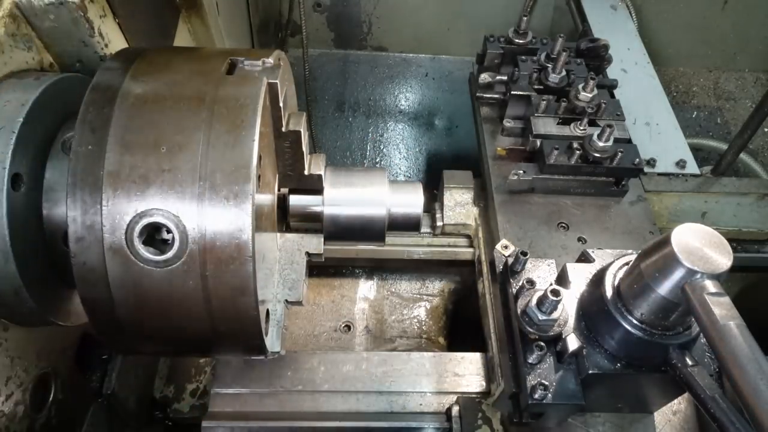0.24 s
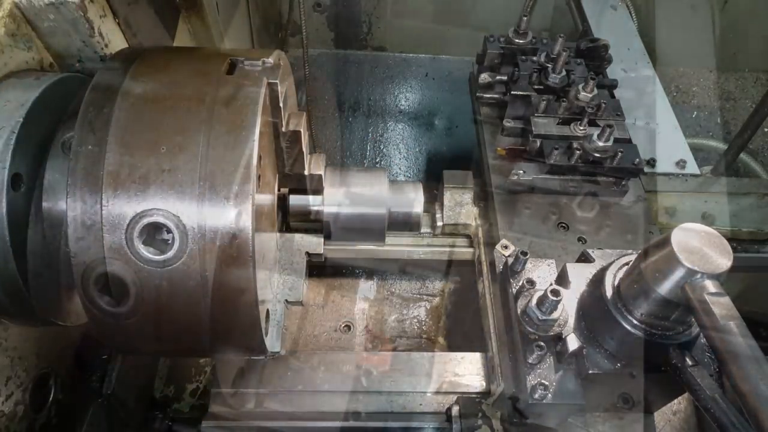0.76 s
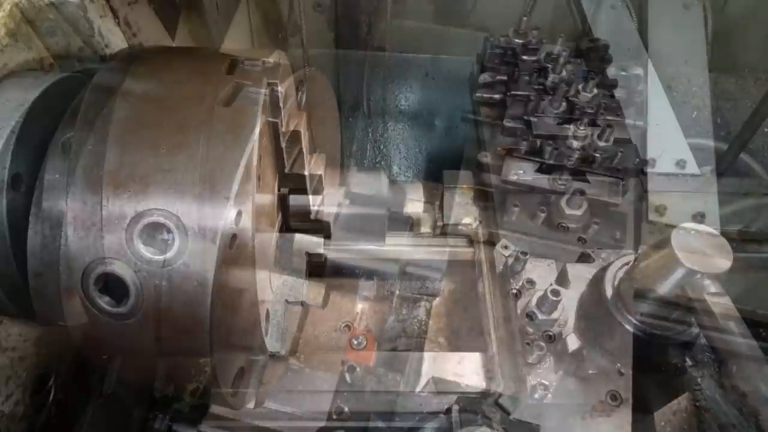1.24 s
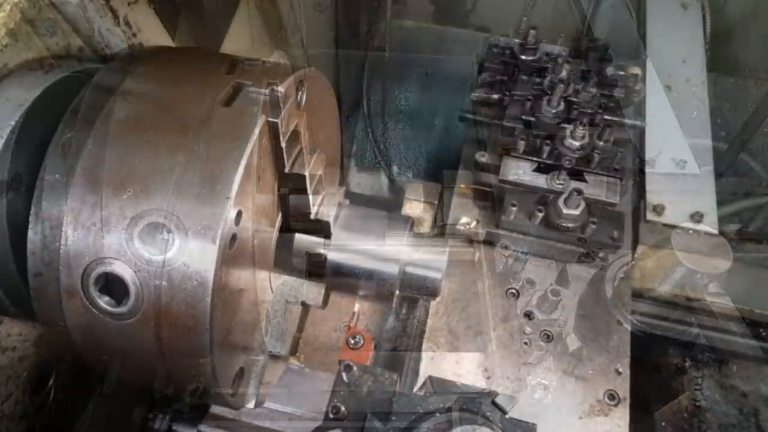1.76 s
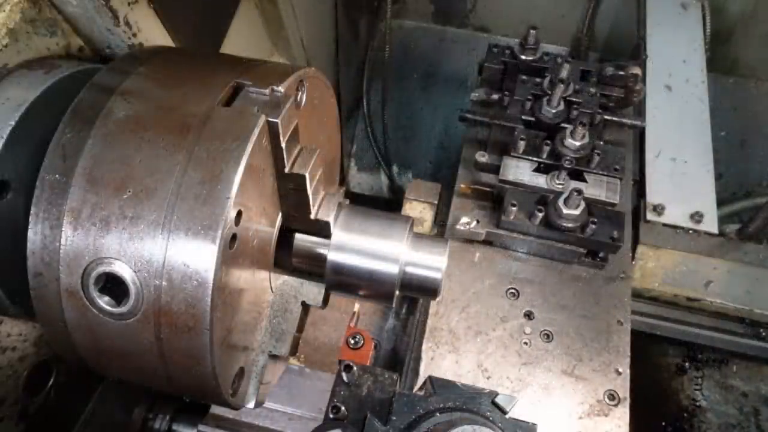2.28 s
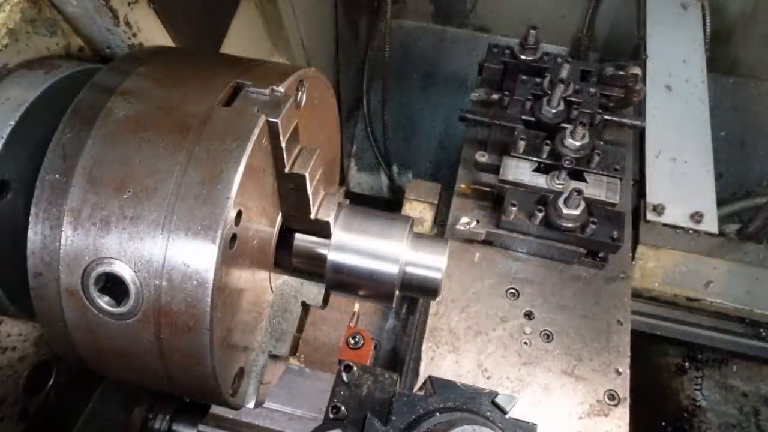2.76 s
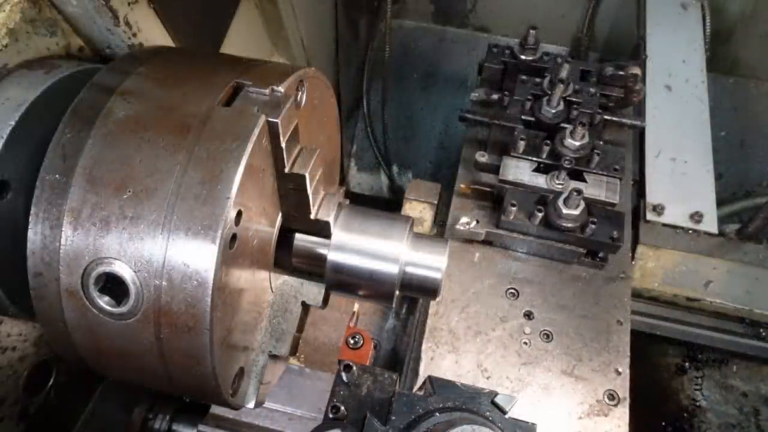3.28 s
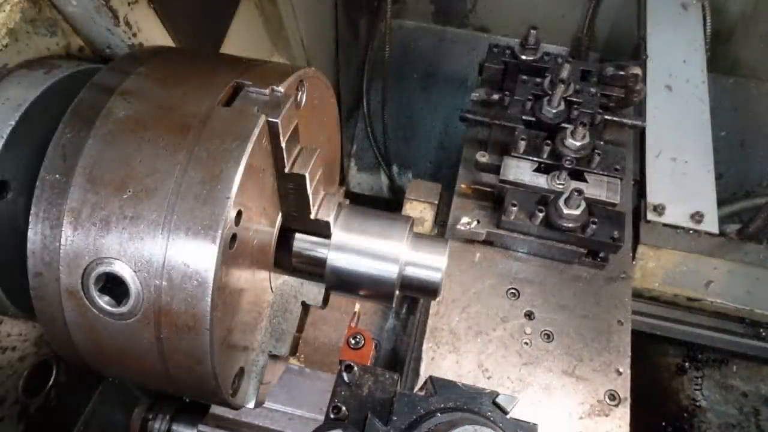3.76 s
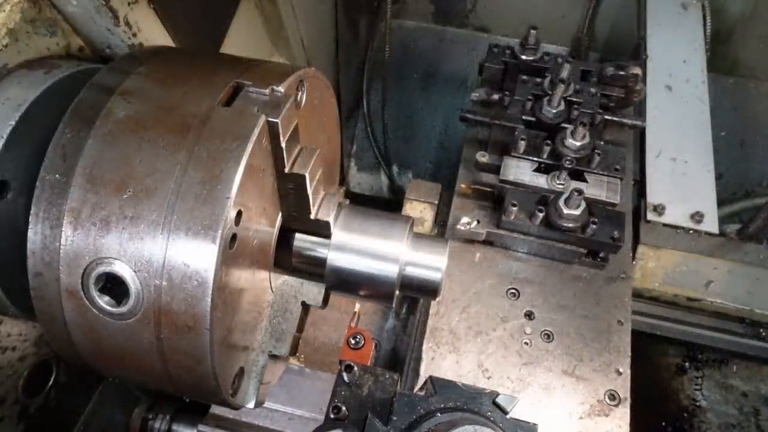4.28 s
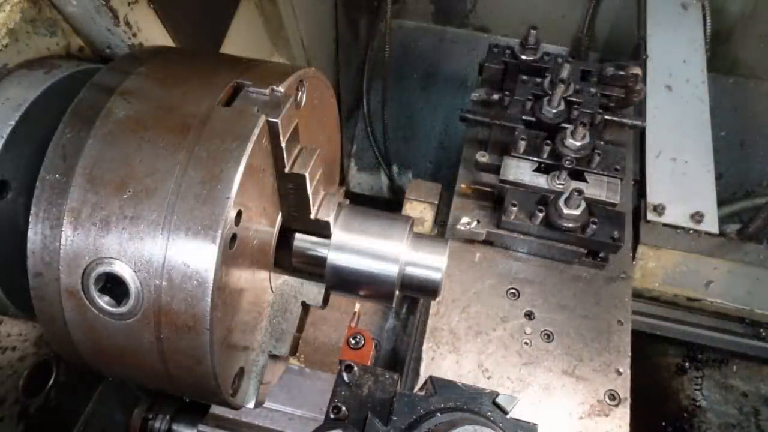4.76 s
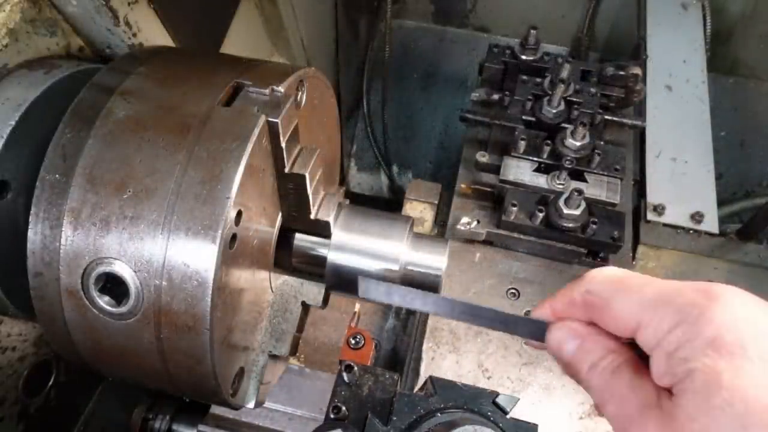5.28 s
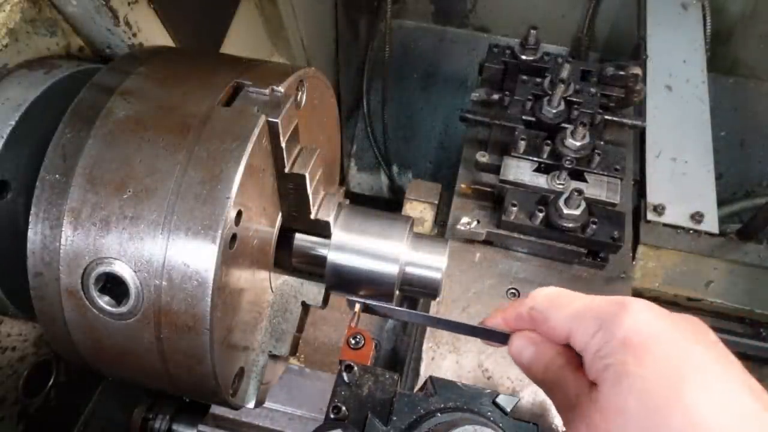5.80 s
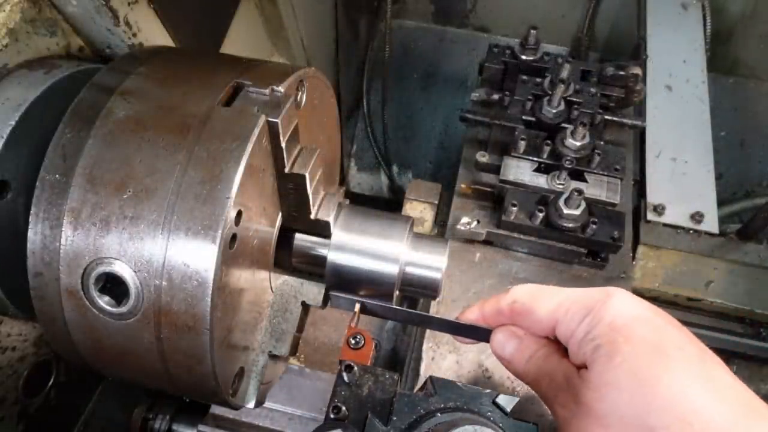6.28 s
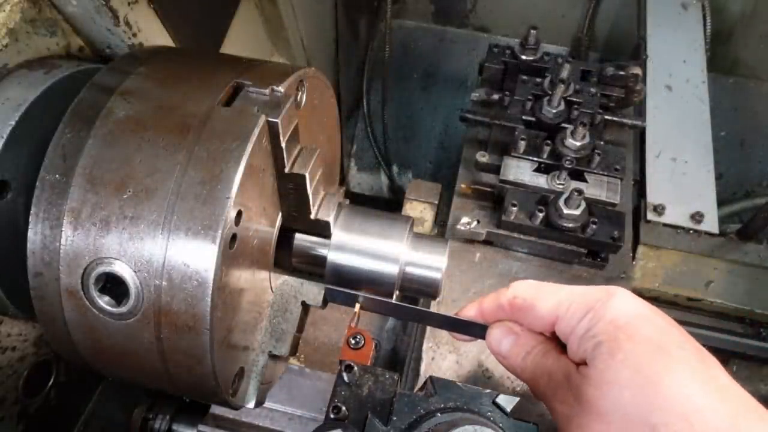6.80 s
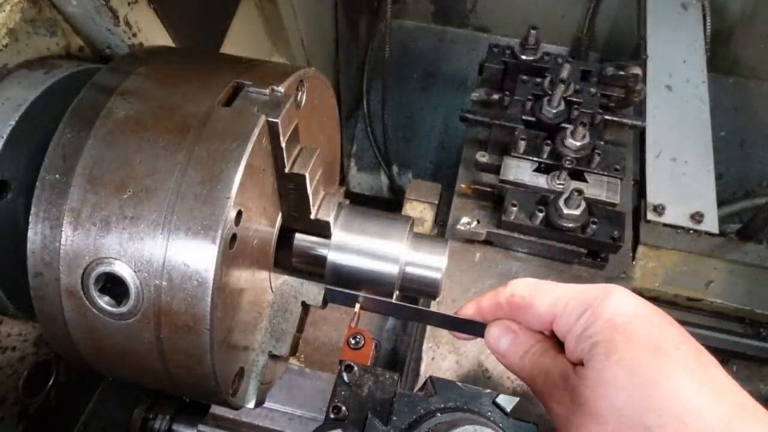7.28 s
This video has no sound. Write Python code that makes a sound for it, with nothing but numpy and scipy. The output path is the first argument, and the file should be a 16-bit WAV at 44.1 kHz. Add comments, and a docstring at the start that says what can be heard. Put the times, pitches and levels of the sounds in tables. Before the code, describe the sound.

In a small workshop with a faint hum, metal parts are handled on a lathe near the microphone. A chuck key rings brightly and rattles until it seats with a clunk. Lighter parts knock here and there, heavy ones clunk about halfway through and again a little later, and a file finishes with a few thin ticks. Quiet rustling fills some of the gaps, and each impact has a short echo.

```python
"""A brisk brush of hiss and a soft clunk come first, then the bright clang of a steel chuck key: a workpiece is
being clamped in a lathe in a small, hard-walled workshop. Impacts excite the key's natural modes, and it
rattles until it seats. The seating key and heavy parts clunk, lighter ones knock and a file ticks against the
work, each a burst of contact noise shaped by resonances and prolonged by reflections. Under it lie the rustle
of handling, dull bumps, a faint rasp, thin squeals, motor hum and shop air."""
import sys
import numpy as np
from scipy import signal
from scipy.fft import rfft, irfft, next_fast_len
from scipy.io import wavfile
from scipy.ndimage import uniform_filter1d, minimum_filter1d

SR = 44100
rng = np.random.default_rng(int(sys.argv[2]) if len(sys.argv) > 2 else 0)


def persist_wave(psi):
    """Save psi, clipped to +-1, as 16-bit WAV."""
    counts = np.round(np.clip(psi, -1, 1) * 32767).astype(np.int16)
    wavfile.write(sys.argv[1], SR, np.atleast_2d(counts).T)


N = 332514
TIME = np.arange(N) / SR
KEY_STRIKE_S, KEY_SEATED_S, KEY_PIVOT_HZ = .7578, .94, 5000

# modes of the free key, and of key and chuck ringing as one: pitch_hz, level_db
FREE_KEY_MODES = [(3617, -28), (3683, -39), (3748, -40), (3812, -40), (4466, -41), (5299, -42), (5420, -44),
                  (5588, -36), (5637, -31.5), (6438, -39), (6619, -35), (7710, -36.5), (8367, -38),
                  (9223, -38), (10310, -41), (14003, -43), (14205, -39)]
SEATED_KEY_MODES = [(565, -44), (603, -41), (655, -44), (721, -44), (3770, -38.5), (4528, -43), (5400, -43),
                    (6550, -46)]
# blows that excite them: start_s, strength_db, tilt_db_per_octave (about the pivot), hold_s
FREE_KEY_STRIKES = [(0.758, -2, -2, 0.02), (.802, -2, 1, 0.036), (0.866, -11, -3, 0.02)]
SEATING_STRIKES = [(0.948, 2.5, -0.5, 0.0074), (.987, -11, -4, 0.0035)]
# clunks: the key seating in the chuck (0.87-0.99 s), then heavy parts: start_s, level_db, boom_db, body_db,
# bright_db, scrape_s, chatter_s, pan_db
CLUNK_BLOWS = [ (.172, -48, 9, -4, 13, 0.0037, 0.033, 1.5), (.866, -31, -10, -8, -1, 0.014, 0.018, 1.5),
               (.959, -28.5, -9, 1, 14, 0.026, 0.025, 3), (.988, -26.5, -6, 3, 8, 0.022, 0.03, 0.5),
               (3.555, -33.5, 15, 3, 19, 0.0042, 0.26, -1.5), (3.591, -27, 8, -4, 26, 0.0041, 0.036, -3.5),
               (3.598, -22.5, 13.5, -3, 22.5, 0.0026, 0.11, -1.5),
               (3.620, -34, 11, 2, -6, 0.0029, 0.098, 2), (3.671, -42, 24, 9, -10, 0.037, 0.14, 5),
               (3.988, -38.5, -3, -6, 14, 0.0005, 0.08, -1), (5.043, -37, -8, -3, 2, 0.012, 0.044, 1),
               (5.056, -26.5, -9, 5.5, 3.5, 0.0065, 0.13, -1.5),
               (5.080, -34.5, 8.5, 0, 6.5, 0.026, 0.14, 0)]
# light blows: start_s, level_db, body_db, bright_db, scrape_s, chatter_s
LIGHT_BLOWS = [ (1.189, -48, 3, -26, .006, .015), (1.224, -50, 4.5, 0, 0.0011, 0.32),
               (1.861, -45.5, 6.5, -8, 0.0026, 0.12), (2.070, -50, -2, -15, 0.011, 0.026),
               (2.085, -36.5, -1.5, -12.5, 0.0014, 0.075), (2.705, -41, -5.5, 3, .002, 0.098),
               (2.844, -25, -4, -2, 0.0057, 0.011), (2.870, -39, 8.5, 10, 0.024, 0.06),
               (3.161, -54, -8, -12, 0.0018, 0.069), (3.5205, -37.5, -1.5, -19, 0.0076, 0.059),
               (4.165, -49, -3, 20, 0.0009, .012), (5.420, -51, -5, -19, 0.017, 0.21),
               (6.799, -56.5, 24, -16, .007, 0.034)]
# file contacts: start_s, level_db, bright_db, scrape_s, chatter_s
FILE_TICKS = [ (0.7359, -47.5, 1, .001, 0.007), (5.516, -46, 3, 0.0024, 0.0083),
              (5.948, -47.5, -7, 0.0019, 0.021), (6.468, -51.5, -10, 0.025, 0.018),
              (6.545, -44, -11.5, 0.016, 0.023), (6.552, -50, 9, 0.0024, 0.012)]
# resonances of the machine casing, light parts and file: pitch_hz, width_hz, lift_db
CASING_RESONANCES = [(240, 20, 0), (288, 22, 3), (410, 45, -2), (552, 30, 0), (660, 30, 1), (920, 60, -3),
                     (2350, 160, -1), (4950, 240, 4), (5830, 40, 2)]
LIGHT_PART_RESONANCES = [(985, 90, -7), (1830, 240, -5), (2710, 130, 1), (2960, 90, -6)]
FILE_RESONANCES = [(1870, 260, -0.5), (5020, 250, -9)]
# contact spectra of the key, heavy parts, light parts and file: frequency_hz, gain_db
RATTLE_SPECTRUM = [(40, -52), (130, -17.5), (300, -13.5), (600, -2.5), (1200, -9.5), (2300, -0.5),
                   (3300, -4), (4900, 0.5), (7000, -6), (9500, -6), (12000, -11), (15500, -26)]
CLUNK_SPECTRUM = [(40, -39.5), (110, -16.5), (220, -2.5), (350, -6), (560, -0.5), (900, 0), (1300, -1.5),
                  (1700, -1.5), (2600, -4.5), (3400, -10.5), (5000, -19.5), (7000, -24), (10000, -27.5),
                  (15500, -36)]
KNOCK_SPECTRUM = [(60, -23), (170, -6), (400, -14), (800, -9.5), (1300, 2), (1800, 1), (2800, -7),
                  (4000, -10), (6000, -22.5), (8000, -39), (15000, -58)]
TICK_SPECTRUM = [(300, -31), (1400, -13), (2000, -2.5), (3200, -12), (4200, -7.5), (6500, -5.5),
                 (9000, -9.5), (12500, -15.5), (15500, -24.5)]
# light steel-on-steel touches: peak_s, pitch_hz, level_db, half_length_s, width_hz
STEEL_TOUCHES = [(0.929, 3785, -38, .018, 110), (1.145, 5330, -65, .03, 90), (1.279, 5300, -57, 0.011, 90),
                 (1.501, 5220, -61, 0.006, 700), (2.884, 10850, -71, .026, 70),
                 (4.169, 3146, -48, 0.007, 450), (4.274, 3350, -53, 0.007, 900),
                 (4.575, 3800, -56, .003, 1100), (5.651, 2746, -55, 0.0052, 400),
                 (5.948, 3050, -48.5, 0.004, 450)]
# rustling movements: start_s, hold_s, level_db, treble_db
RUSTLE_MOVES = [(0, 0.47, -57, 3.5), (2.21, 0.28, -57.5, -10), (3.834, 0.58, -54.5, -6.5),
                (4.774, 0.53, -53, -16)]
# shifts of weight on the machine: start_s, hold_s, level_db
WEIGHT_SHIFTS = [(0, 0.28, -59), (0.912, 0.089, -55), (1.348, 0.24, -62.5), (2.731, 0.16, -51.5),
                 (5.083, 0.019, -59)]
# course of the rasp: time_s, pitch_hz, level_db
RASP_GLIDE = [(4.6, 2530, -81), (4.78, 2510, -62.5), (5.0, 2560, -56.5), (5.258, 2680, -54),
              (5.38, 2730, -59), (5.55, 2630, -59.5), (5.62, 2640, -87)]
# high squeals: peak_s, top_hz, level_db, half_length_s, sag_hz
SQUEAL_ARCHES = [(1.11, 13700, -74, .09, 1500), (6.27, 9400, -75, .14, 250), (6.33, 13650, -76, .16, 550)]
# partials of the motor: pitch_hz, level_db
HUM_PARTIALS = [(199.5, -70.5), (500.5, -77.5), (899, -75.5)]
# noise spectra of the rustle, bumps and shop air: frequency_hz, gain_db
RUSTLE_SPECTRUM = [(200, -7), (500, 3), (1400, 5.5), (3000, 2), (6000, 1), (9000, -1), (15000, -7.5)]
BUMP_SPECTRUM = [(25, -22.5), (50, -20), (70, -8.5), (130, 2), (200, 4.5), (320, -3), (600, -9),
                 (2000, -55)]
AIR_SPECTRUM = [(30, -40.5), (168, -10.5), (192, -6.5), (307, -9.5), (432, -12), (492, -12), (747, -12),
                (897, -6), (1330, -13.5), (1820, -12), (2020, -17), (3780, -23), (6370, -25.5),
                (15500, -28)]
# reverberation time of the workshop: frequency_hz, t60_s
REVERB_TIMES = [(100, 0.5), (300, 0.6), (1000, 0.42), (3000, 0.38), (7000, 0.36), (15000, 0.31)]
# left-right difference picked up by closely spaced microphones: frequency_hz, gain_db
STEREO_WIDTH = [(250, -12), (700, -5), (2000, -2), (12000, 0.5)]


def key_ring(seated_t60_s=.25):
    """Contact damping: seating stills the key's bright ring, shifts its modes and rings the chuck."""
    free = steel_ring(FREE_KEY_MODES, FREE_KEY_STRIKES, t60_s=.28)
    seated = steel_ring(SEATED_KEY_MODES, SEATING_STRIKES, t60_s=.19)
    return free * decay(TIME - KEY_SEATED_S, seated_t60_s) + seated


def steel_ring(modes, strikes, t60_s, t60_slope=.15, shake_db=3.0, waver_rad=.5, spread_db=1.2):
    """Modal vibration: blows add energy; modes hold while the steel skitters, then fade, highs first."""
    out = np.zeros((2, N))
    live = (TIME > KEY_STRIKE_S) & (TIME < KEY_STRIKE_S + 1)
    t = TIME[live]
    for hz, db in modes:
        mode_t60_s = t60_s * (KEY_PIVOT_HZ / hz) ** t60_slope
        energy = 0
        for s, strength_db, tilt_db, hold_s in strikes:
            strength = undb(strength_db + tilt_db * np.log2(hz / KEY_PIVOT_HZ))
            energy += ((t > s) * strength * decay(t - s - hold_s, mode_t60_s)) ** 2
        phase = 2 * np.pi * hz * (t - KEY_STRIKE_S) + waver_rad * walk(70)[live]
        ring = np.sqrt(2 * energy) * np.sin(phase)
        out[:, live] += pan(spread_db * rng.standard_normal()) * undb(db + shake_db * walk(60)[live]) * ring
    return out


def key_rattle(width_hz=35, lift_db=12):
    """Forced vibration: a crack and skitter drive the key; the chuck's body joins as contact firms."""
    crack = undb(-19) * swell(KEY_STRIKE_S, hold_s=0, attack_s=.00098, release_s=.018)
    sliding = undb(-24.5) * swell(.7934, hold_s=.041, attack_s=.044, release_s=.043)
    firming = undb(-25.5) * swell(.83, hold_s=.012, attack_s=.027, release_s=.3)
    strongest_db = max(db for _, db in FREE_KEY_MODES)
    modes = [(hz, width_hz, lift_db + (db - strongest_db) / 2) for hz, db in FREE_KEY_MODES]
    skitter = colour(grains(N, spread_db=3.0) + undb(-6.5) * rng.standard_normal((2, N)), RATTLE_SPECTRUM)
    steel = unit(resonate(skitter, modes))
    body = butterworth(unit(skitter), 1, 1500, "low")
    return steel * crack + (TIME > KEY_STRIKE_S) * (steel * sliding + body * firming)


def clunks():
    """Impact excitation: the key seating in the chuck and heavy parts drive the resonances of the machine
    casing."""
    return blows(CLUNK_BLOWS, CLUNK_SPECTRUM, CASING_RESONANCES,
                 crack_db=-5, crack_s=.0013, side_db=-10, spread_db=1)


def knocks(boom_over_body_db=-2, pan_db=-2):
    """Contact-dependent resonance: light parts sound at slightly different pitches with each blow."""
    rows = [(s, db, body_db + boom_over_body_db, body_db, bright_db, scrape_s, chatter_s, pan_db)
            for s, db, body_db, bright_db, scrape_s, chatter_s in LIGHT_BLOWS]
    return blows(rows, KNOCK_SPECTRUM, LIGHT_PART_RESONANCES,
                 crack_db=-2, crack_s=.0084, side_db=-12, spread_db=2, detune=.07)


def file_ticks(pan_db=-1.5):
    """Brief contact has a broad spectrum: the file ticks brightly against the work."""
    rows = [(s, db, 0, 0, bright_db, scrape_s, chatter_s, pan_db)
            for s, db, bright_db, scrape_s, chatter_s in FILE_TICKS]
    return blows(rows, TICK_SPECTRUM, FILE_RESONANCES,
                 crack_db=-4.5, crack_s=.0013, side_db=-14.5, spread_db=-3.5)


def blows(rows, spectrum, modes, crack_db, crack_s, side_db, spread_db, detune=0):
    """Source and filter: parts scrape, meet with a crack and chatter to rest, driving resonances."""
    out = np.zeros((2, N + 2 * SR))
    lead = SR // 8  # time for the scrape ahead of the impact
    t = (np.arange(SR) - lead) / SR
    before, after = np.maximum(-t, 0), np.maximum(t, 0)
    crack = undb(crack_db) * (t >= 0) * np.exp(-after / crack_s)
    for s, db, boom_db, body_db, bright_db, scrape_s, chatter_s, pan_db in rows:
        contact = 10 ** (-before / scrape_s - after / chatter_s) + crack
        mid = grains(SR, spread_db)
        side = undb(side_db) * rng.standard_normal(SR)
        force = contact * np.array([mid + side, mid - side])
        tone = [(60, boom_db / 2), (260, boom_db), (700, body_db), (2000, 0), (5500, bright_db)]
        shifted = [(hz * (1 + detune * rng.uniform(-1.2, 1)), width, lift) for hz, width, lift in modes]
        hit = resonate(colour(colour(force, spectrum), tone), shifted)
        loudest_rms = np.sqrt(uniform_filter1d(np.mean(hit ** 2, axis=0), size=441).max())  # over 10 ms
        start = int(s * SR)
        out[:, start:start + SR] += hit / loudest_rms * undb(db) * pan(pan_db)
    return out[:, lead:lead + N]


def squeaks(scuff_db=-9, scuff_q=1.8):
    """Bandwidth sets timbre: steel brushing steel ticks if its resonance is wide and pings if narrow."""
    out = 0
    for s, hz, db, half_s, width_hz in STEEL_TOUCHES:
        tone = np.sqrt(2) * np.sin(2 * np.pi * hz * TIME + walk(2 * width_hz))
        scuff = unit(signal.lfilter(*signal.iirpeak(hz, scuff_q, fs=SR), rng.standard_normal(N)))
        out += undb(db) * np.exp(-((TIME - s) / half_s) ** 2) * (tone + undb(scuff_db) * scuff)
    return out


def brush():
    """High-passed noise: one brisk brush of hiss at the start."""
    hiss = unit(butterworth(stereo_noise(N, side_db=-17), 4, 4800, "high"))
    return hiss * undb(-49.5 + 1.8 * walk(39)) * swell(.057, hold_s=.16, attack_s=.06, release_s=.061)


def rustle(treble_hz=4000):
    """Amplitude-modulated noise: each movement swells and dies away with its own share of treble."""
    noise = unit(colour(stereo_noise(N, side_db=-8), RUSTLE_SPECTRUM))
    treble = butterworth(noise, 1, treble_hz, "high")
    out = 0
    for s, hold_s, db, treble_db in RUSTLE_MOVES:
        shaded = noise - treble + undb(treble_db) * treble
        out += undb(db) * swell(s, hold_s, attack_s=.29, release_s=.57) * shaded
    return out * undb(.93 * walk(46))


def bumps():
    """Low-frequency excitation: the machine rumbles dully as weight shifts on it."""
    load = sum(undb(db) * swell(s, hold_s, attack_s=.053, release_s=.45)
               for s, hold_s, db in WEIGHT_SHIFTS)
    rumble = unit(colour(stereo_noise(N, side_db=-13.5), BUMP_SPECTRUM))
    return rumble * load * undb(1.6 * walk(22))


def rasp(width_hz=380, grain_db=2, grains_per_s=55):
    """Stick-slip friction: small catches ring one narrow resonance that glides."""
    s, hz, db = np.transpose(RASP_GLIDE)
    friction = butterworth(stereo_noise(N, side_db=-13), 3, width_hz / 2, "low")
    ring = friction * np.sin(2 * np.pi * np.cumsum(np.interp(TIME, s, hz)) / SR)
    return unit(ring * undb(grain_db * walk(grains_per_s))) * undb(np.interp(TIME, s, db))


def squeals(waver_hz=110):
    """Frequency modulation: a thin, unsteady tone arches in pitch as it swells and sinks."""
    out = 0
    for s, top_hz, db, half_s, sag_hz in SQUEAL_ARCHES:
        away = np.minimum(((TIME - s) / half_s) ** 2, 10)
        hz = top_hz - sag_hz * away + waver_hz * walk(400)
        out += undb(db) * np.exp(-away) * np.sqrt(2) * np.sin(2 * np.pi * np.cumsum(hz) / SR)
    return out


def motor_hum():
    """A line spectrum: the motor's partials waver slightly in level and phase."""
    return sum(undb(db + 1.1 * walk(9.2)) * np.sqrt(2) * np.sin(2 * np.pi * hz * TIME + .7 * walk(3.1))
               for hz, db in HUM_PARTIALS)


def shop_air(level_db=-60.3):
    """A continuous spectrum: the air of the shop is a nearly steady broadband noise."""
    return unit(colour(stereo_noise(N, side_db=-5.5), AIR_SPECTRUM)) * undb(level_db + .53 * walk(9))


def room(x, wet_db, side_db=-9, build_s=.00058):
    """Reverberation: dense reflections follow the direct sound, and their treble dies first."""
    t, hz = TIME[:SR], np.arange(SR // 2 + 1)
    field, tail = rfft(stereo_noise(SR, side_db)), 0
    for low_hz in 2 ** np.arange(4, 15):
        octave = irfft(field * ((hz >= low_hz) & (hz < 2 * low_hz)), SR)
        tail += octave * decay(t, at(REVERB_TIMES, low_hz * np.sqrt(2)))
    tail = unit(tail * (1 - np.exp(-t / build_s))) / np.sqrt(SR)
    return x + undb(wet_db) * signal.fftconvolve(x, tail, axes=1)[:, :N]


def microphone_pair(x):
    """Long waves are coherent over short distances: bass reaches both close microphones alike."""
    mid, side = (x[0] + x[1]) / 2, (x[0] - x[1]) / 2
    side = irfft(rfft(side) * undb(at(STEREO_WIDTH, np.arange(N // 2 + 1) * SR / N)), N)
    return np.array([mid + side, mid - side])


def resonate(x, modes):
    """Sympathetic resonance: each mode rings and adds to the sound that drives it."""
    return x + sum(undb(db) * signal.lfilter(*signal.iirpeak(hz, hz / width_hz, fs=SR), x)
                   for hz, width_hz, db in modes)


def colour(x, spectrum):
    """Minimum-phase filtering: folding the cepstrum gives a causal response with this spectrum."""
    n = x.shape[-1]
    size = 2 * next_fast_len(n // 2 + 1024)
    cepstrum = irfft(np.log(undb(at(spectrum, np.arange(size // 2 + 1) * SR / size))))
    cepstrum[1:size // 2] *= 2
    return irfft(rfft(x, size) * np.exp(rfft(cepstrum[:size // 2], size)))[..., :n]


def butterworth(x, order, cutoff_hz, kind):
    """Maximally flat filtering, low-pass or high-pass."""
    return signal.sosfilt(signal.butter(order, cutoff_hz, kind, fs=SR, output="sos"), x)


def swell(s, hold_s, attack_s, release_s):
    """Exponential envelope: reaches one at s, holds and falls; attack and release each span 20 dB."""
    return 10 ** (-np.maximum(s - TIME, 0) / attack_s - np.maximum(TIME - s - hold_s, 0) / release_s)


def decay(t, t60_s):
    """Exponential damping: 60 dB per t60_s once t passes zero."""
    return np.exp(-np.log(1000) * np.maximum(t, 0) / t60_s)


def grains(n, spread_db):
    """Granular noise: dense tiny impacts of uneven size."""
    return unit(rng.standard_normal(n) * undb(spread_db * np.minimum(rng.exponential(size=n), 5)))


def stereo_noise(n, side_db):
    """Partial coherence: noise that is mostly alike in both channels."""
    mid, side = rng.standard_normal((2, n))
    return unit(mid + undb(side_db) * np.array([side, -side]))


def walk(rate_hz):
    """Random modulation: a continuous drift with a spread near one."""
    knots = rng.standard_normal(int(N / SR * rate_hz) + 2)
    return np.interp(TIME * rate_hz, np.arange(len(knots)), knots)


def pan(db):
    """Level difference gives direction: channel gains for left minus right in decibels."""
    return undb(np.array([[db], [-db]]) / 2)


def at(points, hz):
    """Interpolation of (frequency_hz, value) points on a logarithmic frequency axis."""
    frequency_hz, value = np.transpose(points)
    return np.interp(np.log(hz + 1), np.log(frequency_hz), value)


def undb(db):
    """Amplitude ratio of a level in decibels."""
    return 10 ** (np.asarray(db) / 20)


def unit(x):
    """Normalisation to an rms of one."""
    return x / np.sqrt(np.mean(x ** 2))


def scene():
    """Superposition: metal sounds, each as distant as its share of reflections, over the background."""
    key = key_ring() + room(key_rattle(), wet_db=-9)
    parts = room(clunks(), wet_db=-10) + room(knocks(), wet_db=-3.5)
    touches = room(file_ticks() + squeaks(), wet_db=-4)
    handling = brush() + rustle() + bumps() + rasp() + squeals()
    return microphone_pair(key + parts + touches) + handling + motor_hum() + shop_air()


def record(dry, ceiling_db=-5.5, bottom_hz=50, top_hz=15900):
    """Band and peak limiting: the lowest rumble is dropped, peaks are held down and the top is cut."""
    sound = butterworth(dry, 2, bottom_hz, "high")
    needed_gain = 1 / np.maximum(np.abs(sound).max(axis=0) / undb(ceiling_db), 1)
    gain = uniform_filter1d(minimum_filter1d(needed_gain, size=89), size=89)  # smoothed over 2 ms
    return signal.sosfilt(signal.ellip(10, .2, 70, top_hz, fs=SR, output="sos"), sound * gain)


dry = scene()
out = record(dry)
persist_wave(out)
```